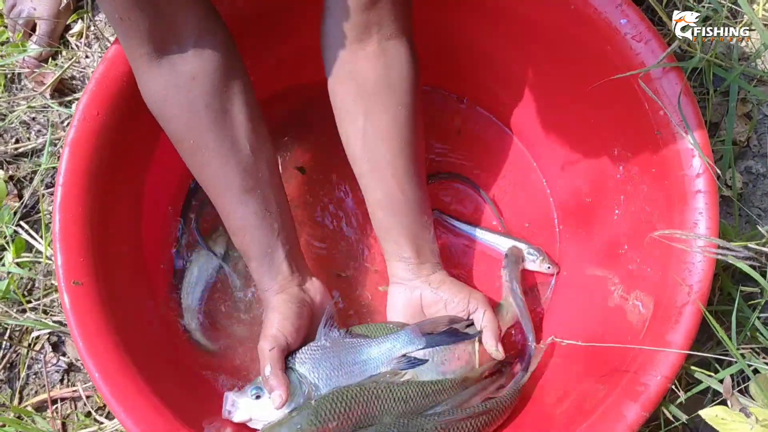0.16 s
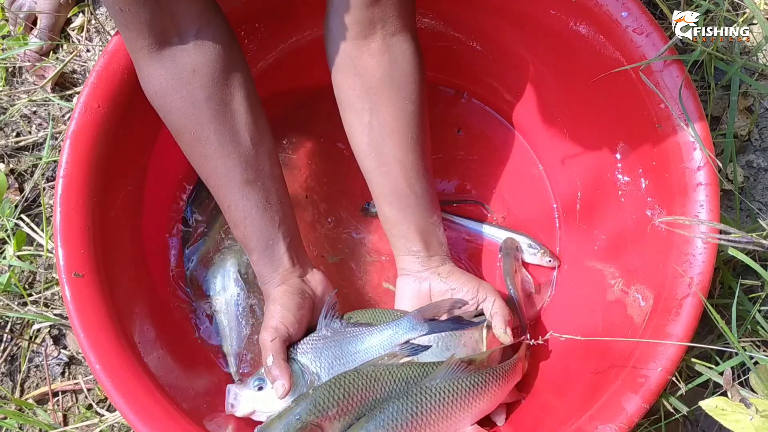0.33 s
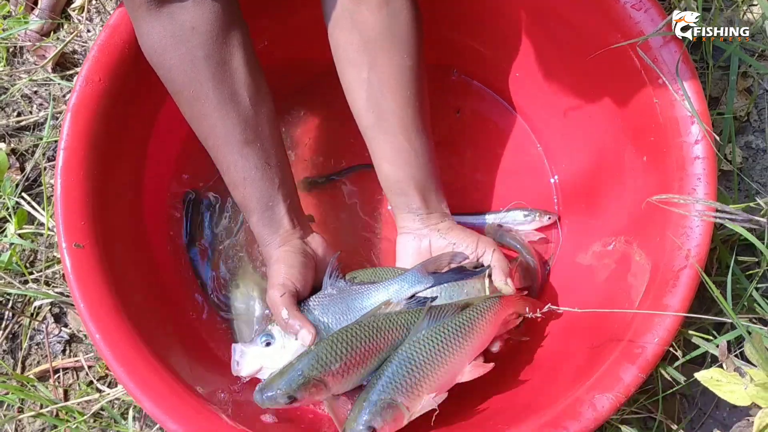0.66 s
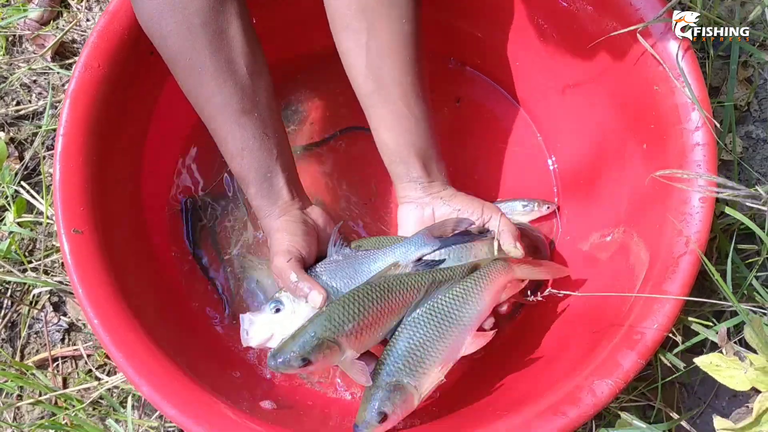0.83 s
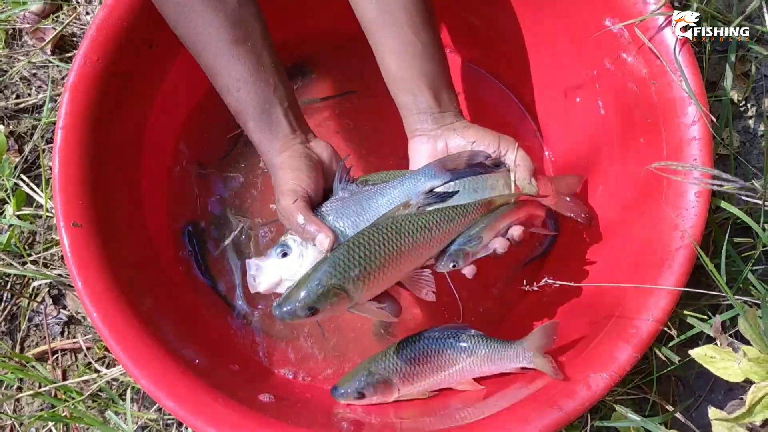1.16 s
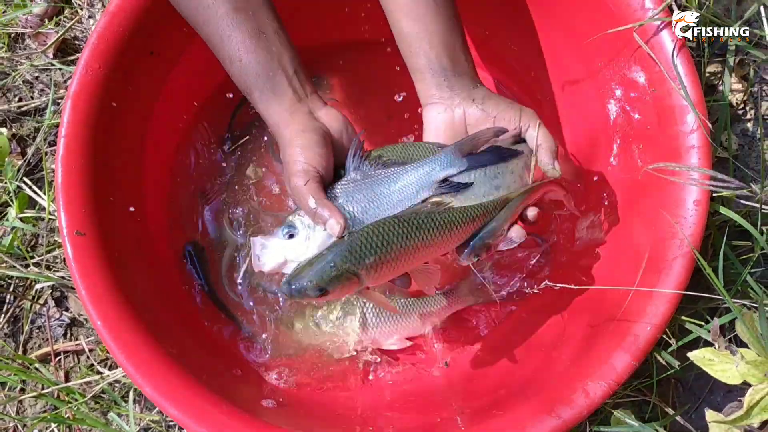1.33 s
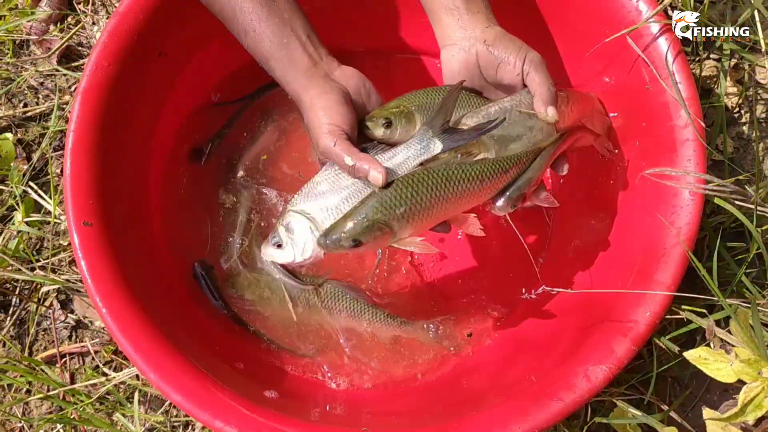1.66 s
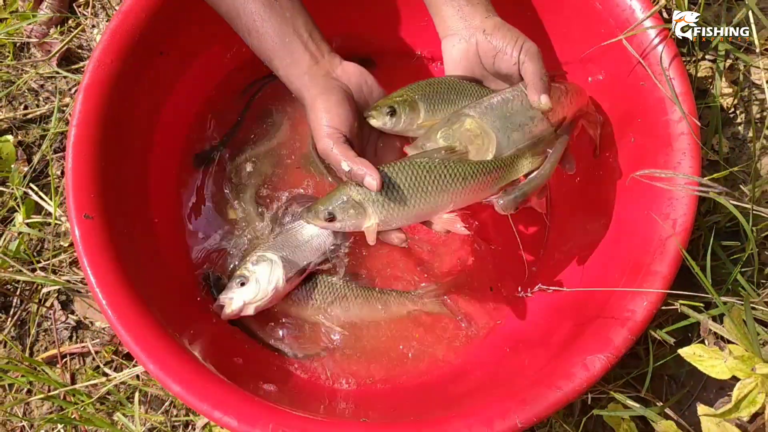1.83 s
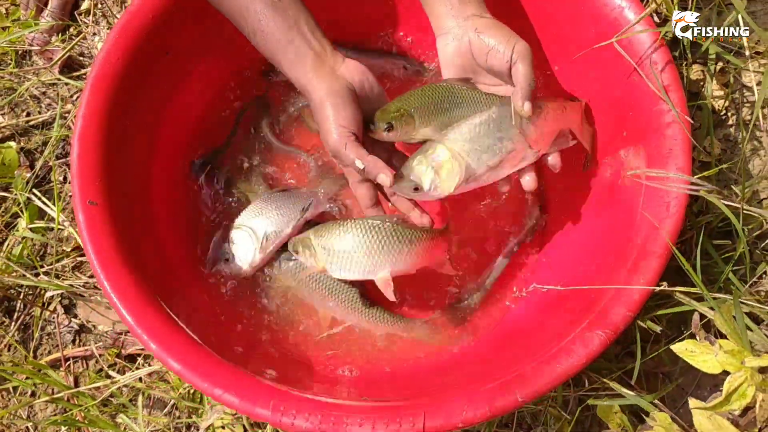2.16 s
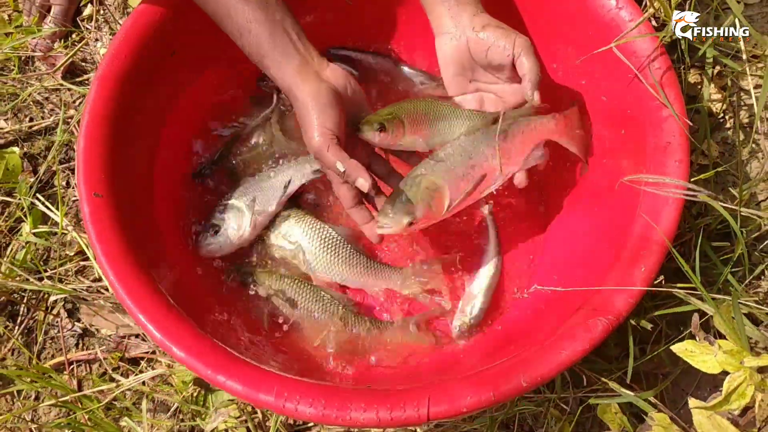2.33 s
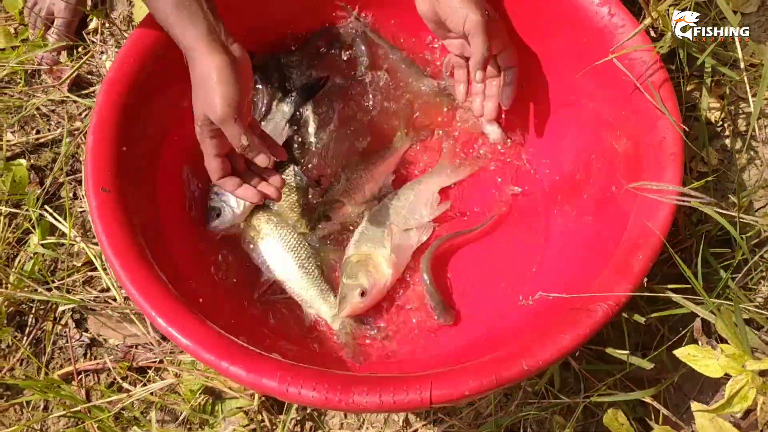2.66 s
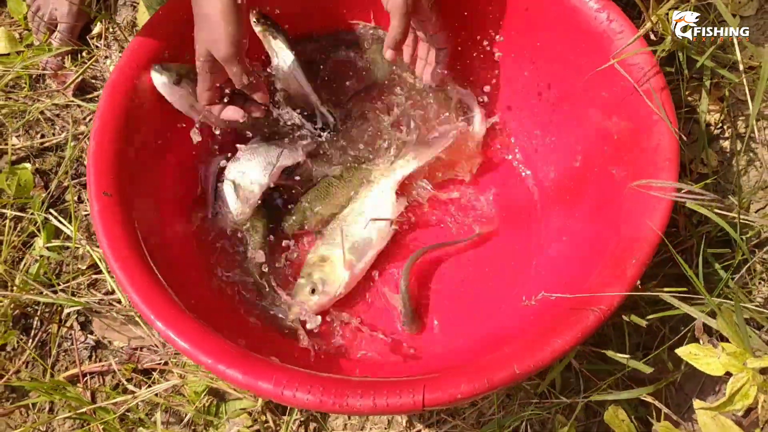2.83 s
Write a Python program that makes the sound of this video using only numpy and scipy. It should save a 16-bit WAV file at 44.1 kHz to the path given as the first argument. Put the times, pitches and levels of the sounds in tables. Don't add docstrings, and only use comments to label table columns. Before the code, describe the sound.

Live fish slap and slosh in shallow water in a hollow plastic tub, in bursts with drips and bubbly glugs between, busiest at the end; close hand-held microphone, low outdoor hum, distant birds.

```python
import sys
import numpy as np
from scipy import signal
from scipy.fft import rfft, irfft
from scipy.io import wavfile

SR = 44100
rng = np.random.default_rng(int(sys.argv[2]) if len(sys.argv) > 2 else 0)


def volts_from_decibels(level):
    exponent = np.asarray(level, float) / 20
    return 10 ** exponent


def dump(signal):
    limited = np.clip(np.atleast_2d(signal).T, -1, 1)
    pcm = np.round(limited * 32767).astype(np.int16)
    wavfile.write(sys.argv[1], SR, pcm)


N = 132300

# start in seconds, peak in dB, bubble pitch in Hz, spray in dB, burst in seconds.
FIRST_SLAPS = [(1.1725, -13, 3056, -13.5, 0.0032), (1.199, -44, 1460, 8, 0.005),
               (1.243, -25, 4350, -1.5, 0.0024), (1.272, -22, 1956, -13, 0.0057),
               (1.316, -34, 1390, -24, 0.002), (1.341, -42.5, 1300, -1, 0.0025),
               (1.374, -36.5, 1430, 5.5, 0.0023), (1.391, -25, 2450, -11.5, 0.0039),
               (1.428, -32.5, 1396, -20, 0.0038), (1.774, -44.5, 1500, 11, 0.0033),
               (1.792, -24, 2355, -6, 0.0026), (1.808, -22.5, 2410, -6, 0.013),
               (1.833, -22, 1630, -28, 0.0047), (1.842, -12.5, 2490, -14, 0.0031),
               (1.88, -27, 1135, -7, 0.0059), (1.934, -20.5, 2460, -32, 0.0017),
               (1.937, -19.5, 1330, -30, 0.0037), (1.986, -20.5, 2350, -15, 0.0062),
               (2.029, -26, 3270, -17, 0.0045), (2.063, -20, 2760, -11, 0.0041),
               (2.087, -40, 1222, 2, 0.0018), (2.114, -26, 2150, -19.5, 0.0037)]
# start in seconds, peak in dB, bubble pitch in Hz, spray in dB,
# burst in seconds.
LAST_SLAPS = [(2.369, -33, 2180, -37, 0.0024), (2.399, -35, 1370, -8, 0.0039),
              (2.436, -20, 1276, -37, 0.012), (2.445, -22, 1330, -25, 0.0027),
              (2.571, -35.5, 3060, -4, 0.011), (2.59, -22, 3150, -3, 0.0015),
              (2.633, -32.5, 2060, -3, 0.0018), (2.716, -28, 1244, -8.5, 0.015),
              (2.763, -16.5, 1415, -12, 0.0046), (2.789, -23.5, 840, -3, 0.0028),
              (2.814, -22, 778, -36, 0.023), (2.868, -15.5, 837, -9, 0.0024), (2.901, -24, 1390, -7, 0.013),
              (2.98, -17.5, 2010, -9.5, 0.0022)]
# start in seconds, peak in dB, pitch in Hz, spray in dB.
DRIPS = [
    (0.358, -43.5, 3130, -16),
    (0.465, -57, 2060, -17),
    (0.4818, -45, 2750, -9.5),
    (1.0687, -36.5, 3690, -14),
    (2.1327, -33.5, 2110, -11),
    (2.168, -39, 2580, -16),
    (2.205, -36, 2530, -19),
    (2.2377, -35, 2600, -15),
    (2.3007, -36, 1270, -34),
    (2.698, -35, 1450, -29),
]
DRIP_BURST_S = 0.0023


def slaps(rows):
    out, t = np.zeros(N), np.arange(SR // 10) / SR
    mids = signal.butter(4, [900, 3700], "band", fs=SR, output="sos")
    tops = signal.butter(3, 5000, "high", fs=SR, output="sos")
    ring_cycles, spray_stretch, body_db, extra_spray_db = 19, 1.52, -6, 5.5
    for s, db, hz, spray_db, burst in rows:
        u = t / np.clip(burst, .0003, .02)
        grit = rng.standard_normal((3, len(t))) * u ** 0.84
        struck = peak_one(ring(grit[0] * np.exp(-u), hz, ring_cycles / hz))
        pitched = bubble(t, hz, min(7.4 * burst, 43.3 / hz), min(0.41 * burst, .002))
        tone = .5 * struck + 1.3 * pitched
        crackle = volts_from_decibels(7.2 * rng.standard_normal(len(t)))
        body = peak_one(signal.sosfilt(mids, grit[1] * np.exp(-u) * crackle))
        spray = grit[2] * grit[0] * np.exp(-2 * u / spray_stretch)
        spray = peak_one(signal.sosfilt(tops, spray))
        add(out, s, volts_from_decibels(db) * (tone + volts_from_decibels(body_db) * body + volts_from_decibels(spray_db + extra_spray_db) * spray))
    return out


def flick():
    snap, start_s, level_db = np.zeros(N), .8659, -6.5
    for lag, db in [(0, 8), (.0009, -6), (.0016, -6.5)]:
        snap[int((start_s + lag) * SR)] = -volts_from_decibels(level_db + db)
    mids = signal.butter(3, [1200, 3200], "band", fs=SR, output="sos")
    return signal.sosfilt(mids, snap) + volts_from_decibels(-27) * np.gradient(snap)


# start in seconds, peak in dB.
SPATTER = [(0.2453, -58), (0.4075, -57), (0.464, -50), (0.6085, -60), (1.069, -50), (1.3606, -38),
           (1.482, -60), (1.538, -58), (1.8664, -26), (1.9104, -38), (1.919, -28.5), (1.952, -32.5),
           (2.0012, -26.5), (2.028, -32), (2.0452, -27), (2.0794, -22.5), (2.1281, -38), (2.1786, -38.5),
           (2.198, -39), (2.2802, -42), (2.3406, -50), (2.413, -30.5), (2.4468, -22.5), (2.4732, -24),
           (2.4923, -22.5), (2.5122, -25.5), (2.546, -39), (2.5762, -30), (2.6073, -28.5), (2.6536, -34.5),
           (2.7097, -37), (2.7252, -31.5), (2.791, -23), (2.814, -24), (2.837, -35)]


def spatter():
    out, t = np.zeros(N), np.arange(SR // 20) / SR
    tops = signal.butter(3, 5370, "high", fs=SR, output="sos")
    u = t / 0.0018
    for s, db in SPATTER:
        hiss = signal.sosfilt(tops, rng.standard_normal(len(t))) * u * np.exp(1 - u)
        add(out, s, volts_from_decibels(db - 1) * peak_one(hiss))
    return out


# start in seconds, peak in dB, pitch in Hz.
BLIPS = [(.003, -49.5, 687), (.043, -46, 718), (.123, -46, 1170), (.553, -52.5, 3400), (2.715, -37, 794),
         (1.247, -28.5, 1220), (1.285, -30.5, 3060), (1.304, -39, 1320), (1.315, -33, 2020),
         (1.32, -41, 696), (1.379, -37, 1350), (1.398, -32, 1980), (1.94, -33, 3220), (1.949, -27, 2980),
         (2.072, -32, 1130), (2.262, -46, 2360), (2.342, -43, 600), (2.358, -35.5, 1460),
         (2.396, -36, 1940), (2.408, -33, 1320), (2.418, -28.5, 1370), (2.449, -24.5, 3370),
         (2.465, -32, 2540), (2.49, -29, 3190), (2.514, -29, 1380), (2.529, -38, 1610),
         (2.546, -32.5, 2170), (2.606, -36.5, 900), (2.641, -30, 2170), (2.654, -36, 1190),
         (2.676, -34, 2160), (2.724, -29.5, 1960), (2.738, -30, 2000), (2.777, -20.5, 1420),
         (2.786, -21.5, 1890), (2.799, -24, 1270), (2.81, -27.5, 3220), (2.812, -21, 1440),
         (2.821, -16.5, 1380), (2.845, -19.5, 1370), (2.868, -24.5, 4330), (2.894, -28, 3350),
         (2.915, -30.5, 750), (2.94, -26, 1130), (2.992, -26, 1460)]


def blips():
    out, t = np.zeros(N), np.arange(SR // 10) / SR
    for s, db, hz in BLIPS:
        ring_s = 0.011 + 13.6 / hz
        add(out, s, volts_from_decibels(db + 7.5) * bubble(t, hz, ring_s, rise=0.0025))
    return out


# start in seconds, peak in dB, pitch in Hz, ring in seconds.
GLUGS = [(0.278, -45, 255, 0.051), (0.731, -44, 292, 0.049), (0.863, -35.5, 116, 0.047),
         (1.248, -20, 253.4, 0.045), (1.274, -27.5, 246, 0.023), (1.779, -43.5, 144, 0.075),
         (1.839, -28, 283, 0.033), (1.913, -31.5, 271, 0.066), (1.986, -33.5, 273, 0.04),
         (2.068, -30, 160.4, 0.055), (2.341, -32.5, 305, 0.04), (2.459, -36.5, 326.6, 0.13),
         (2.579, -35, 315, 0.046), (2.761, -20, 340, 0.036), (2.782, -24, 268, 0.044),
         (2.824, -13, 179, 0.028), (2.887, -33, 344.5, 0.19)]
# start in seconds, peak in dB, pitch in Hz, ring in seconds.
PLOPS = [
    (0.735, -47.5, 617, 0.03),
    (1.919, -42, 606, 0.012),
    (2.439, -34.5, 579, 0.11),
    (2.883, -30, 622, 0.072),
]


def glugs():
    out, t = np.zeros(N), np.arange(SR // 4) / SR
    for s, db, hz, t60 in GLUGS + PLOPS:
        add(out, s, volts_from_decibels(db + 7) * bubble(t, hz, max(t60, .01), rise=0.91 / hz))
    return out


# frequency in Hz, level in dB per Hz.
WATER = [(90, 7.5), (250, 10.5), (450, -2), (1000, 5.5), (3300, 0.5), (4300, -7.5), (10500, -10),
         (15800, -7)]
# start in seconds, length in seconds, level in dB.
BOUTS = [(0.769, 0.4, -54.5), (1.156, 0.15, -39), (1.311, 0.02, -48), (1.355, 0.051, -37),
         (1.41, 0.11, -56), (1.78, 0.13, -40.5), (1.906, 0.2, -36.5), (2.122, 0.18, -53),
         (2.29, 0.097, -48), (2.396, 0.051, -40.5), (2.439, 0.1, -32.5), (2.565, 0.044, -34),
         (2.619, 0.19, -41), (2.759, .15, -25), (2.914, 0.18, -31.5)]


def churn():
    t = np.arange(N) / SR
    swell_s, settle_db_per_s = 0.015, 900
    level = 0
    for s, length, db in BOUTS:
        settling = settle_db_per_s * np.clip(t - s - length, 0, 1)
        level = level + volts_from_decibels(db - settling) * np.clip((t - s) / swell_s, 0, 1)
    bubbles = colour(cloud(), WATER) * np.minimum(level / volts_from_decibels(-52.5), 1)
    fizz = banded(WATER, patchy_db=4, rate=47)
    spit_share = np.minimum(level / volts_from_decibels(-41), volts_from_decibels(-40) / np.maximum(level, volts_from_decibels(-35)) ** .75)
    return level * (volts_from_decibels(-6.5) * bubbles + volts_from_decibels(-8) * fizz + volts_from_decibels(-9) * spits() * spit_share)


def cloud():
    count, ring_cycles, chirp = 3600, 28, 0.45
    out, clumps = np.zeros(N), np.cumsum(volts_from_decibels(4 * drift(30)))
    when, size, loud, glide = rng.random((count, 4)).T
    births = np.searchsorted(clumps, when * clumps[-1])
    pitches, levels = 160 * 30.15 ** size, -4.5 * np.log(0.18 + loud)
    for i, hz, db, up in zip(births, pitches, levels, glide):
        u = np.arange(int(ring_cycles / hz * SR)) * hz / SR
        shape = volts_from_decibels(db - 60 * u / ring_cycles) * (1 - np.exp(-u / 3.1))
        tone = np.sin(2 * np.pi * u * (1 + chirp * up * u / ring_cycles))
        add(out, i / SR, hz * shape * tone)
    return out


def spits():
    bursts = signal.lfilter([1], [1, -.94], np.abs(grains(rate=700, spread_db=7.0)))
    tops = signal.butter(2, 4000, "high", fs=SR, output="sos")
    return signal.sosfilt(tops, colour(bursts * rng.standard_normal(N), WATER))


def grains(rate, spread_db):
    sizes = volts_from_decibels(spread_db * np.minimum(rng.exponential(1, N), 4)) * rng.choice([-1, 1], N)
    return sizes * (rng.random(N) < rate * volts_from_decibels(4 * drift(25)) / SR)


# pitch in Hz, width in Hz, gain in dB.
BASIN = [(321, 76, 9), (690, 336, 8), (989, 210, -7), (1330, 155, 6), (2270, 315, 2.5), (3270, 165, 3),
         (7550, 1960, 11), (15000, 710, 9)]


def basin(x, share):
    for hz, width, db in BASIN:
        r = np.exp(-np.pi * width / SR)
        poles = [1, -2 * r * np.cos(2 * np.pi * hz / SR), r * r]
        peak = signal.lfilter([(1 - r * r) / 2, 0, (r * r - 1) / 2], poles, x)
        x = x + (volts_from_decibels(share * db) - 1) * peak
    return x


# start in seconds, length in seconds, pitch in Hz,
# level in dB, trill strength (1 is full).
BIRD = [
    (-.05, .29, 4285, -61, 1),
    (0.23, 0.071, 3960, -63, 0.3),
    (0.279, 0.1, 4335, -67, 0.95),
    (0.312, 0.052, 3980, -70, 0.2),
    (0.393, 0.15, 4350, -77.5, 1.26),
    (.585, .08, 4800, -79, 4),
    (.9, 0.089, 4800, -83, 3.9),
    (1.465, .09, 5300, -80, 3.93),
    (1.687, 0.079, 5000, -85, 0.8),
    (2.026, 0.24, 4320, -68.5, 2.5),
]


def birds():
    out, t = np.zeros(N), np.arange(N) / SR
    trill_hz, swing_hz, edge_s = 66.45, 57.4, 0.0084
    wobble = np.cumsum(trill_hz * (1 + 0.098 * drift(22.0))) * 2 * np.pi / SR
    for s, length, hz, db, trill in BIRD:
        shape = np.clip(np.minimum(t - s, s + length - t) / edge_s, 0, 1)
        pitch = hz + trill * (swing_hz * np.sin(wobble) + 45 * drift(24.9))
        throb = 1 + min(trill, 1) * np.cos(wobble)
        out += volts_from_decibels(db) * shape * throb * np.sin(np.cumsum(pitch) * 2 * np.pi / SR)
    echo_t = np.arange(SR // 3) / SR
    echoes = rng.standard_normal(SR // 3) * volts_from_decibels(-60 * echo_t / .3)
    return out + volts_from_decibels(-28.5) * signal.fftconvolve(out, echoes)[:N]


# frequency in Hz, level in dB per Hz.
AIR = [(115, 1.5), (850, -17), (3100, -22), (4300, -34), (6300, -38), (8200, -32.5), (10500, -40.5),
       (15800, -31.5)]


def open_air():
    return volts_from_decibels(-55.5) * banded(AIR, patchy_db=1.95, rate=54)


def rms_one(x):
    return x / np.sqrt(np.mean(x ** 2) + 1e-20)


def peak_one(x):
    return x / np.abs(x).max()


def add(out, s, x):
    i = int(max(s, 0) * SR)
    out[i:i + len(x)] += x[:N - i]


def drift(rate):
    r = np.exp(-80 * np.pi * rate / SR)
    slow = signal.lfilter([1], [1, -2 * r, r * r], rng.standard_normal(N // 40 + 2002))[2000:]
    return np.interp(np.arange(N) / 40, np.arange(len(slow)), rms_one(slow))


def ring(x, hz, t60):
    r, w = volts_from_decibels(-60 / (t60 * SR)), 2 * np.pi * hz / SR
    return signal.lfilter([0, np.sin(w)], [1, -2 * r * np.cos(w), r * r], x + 1e-18)


def bubble(t, hz, t60, rise):
    tone = np.sin(2 * np.pi * hz * t * (1 + 0.06 * t / t60))
    return tone * (1 - np.exp(-(t / rise) ** 2)) * volts_from_decibels(-60 * t / t60)


def colour(x, spectrum):
    hz, db = np.transpose(spectrum)
    f = np.maximum(np.arange(N // 2 + 1) * SR / N, 1)
    gain = volts_from_decibels(np.interp(np.log(f), np.log(hz), db))
    return rms_one(irfft(rfft(x) * gain, N))


def banded(spectrum, patchy_db, rate):
    out, together, edges = 0, drift(rate), 30 * 2 ** np.arange(0, 9.6, .5)
    white = rng.standard_normal((2, N))
    for k, (low, high) in enumerate(zip(edges, edges[1:])):
        sos = signal.butter(2, [low, min(high, 21000)], "band", fs=SR, output="sos")
        band = signal.sosfilt(sos, white[k % 2])
        out = out + volts_from_decibels(patchy_db * (0.2 * together + drift(rate))) * band
    return colour(out, spectrum)


def scene():
    drips = [(*drip, DRIP_BURST_S) for drip in DRIPS]
    water = churn() + flick() + slaps(FIRST_SLAPS + LAST_SLAPS + drips)
    splashing = volts_from_decibels(-6) * basin(water, 1) + volts_from_decibels(-5) * basin(spatter(), 0.84)
    mix = splashing + glugs() + blips() + birds() + basin(open_air(), 0.46)
    return mix[None]


def low_pass(x):
    return signal.sosfilt(signal.butter(12, 16860, fs=SR, output="sos"), x)


def record(dry):
    x = signal.sosfilt(signal.butter(5, 88, "high", fs=SR, output="sos"), dry)
    x = signal.sosfilt(signal.cheby2(20, 60, 15980, fs=SR, output="sos"), x)
    return low_pass(x)


dry = scene()
out = record(dry)
dump(out)
```